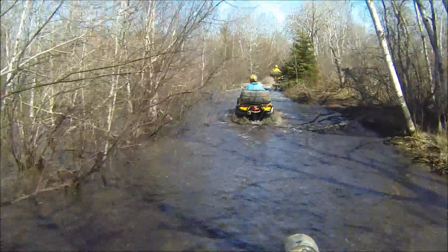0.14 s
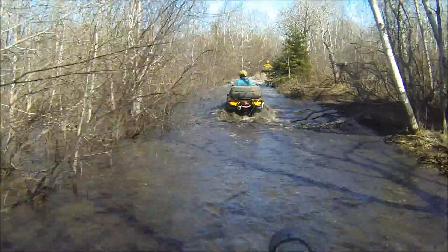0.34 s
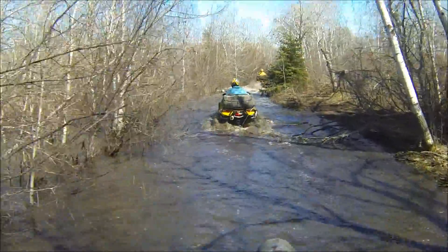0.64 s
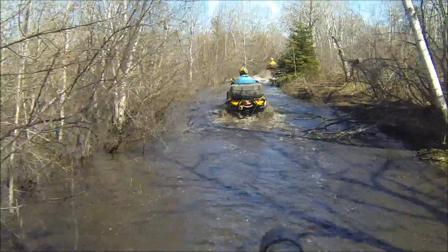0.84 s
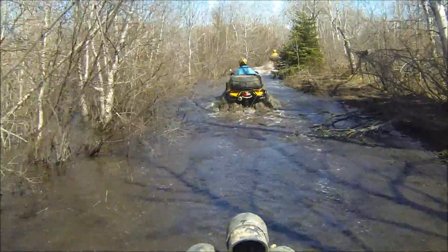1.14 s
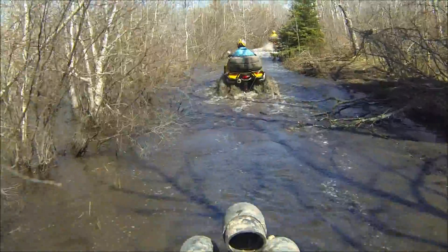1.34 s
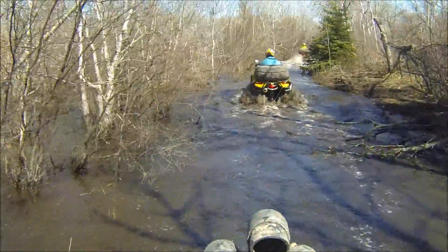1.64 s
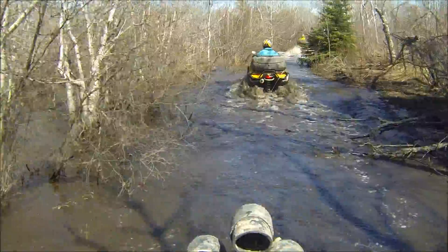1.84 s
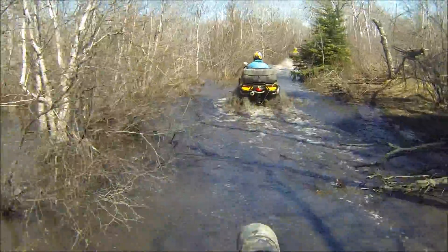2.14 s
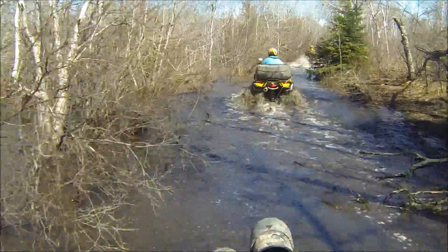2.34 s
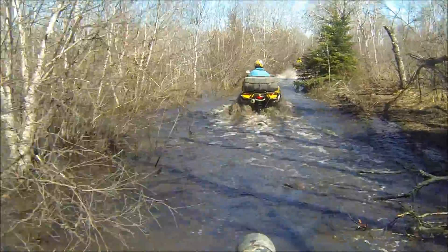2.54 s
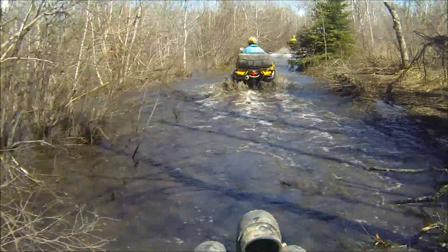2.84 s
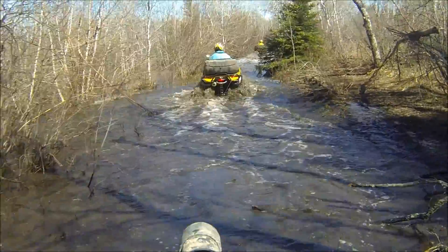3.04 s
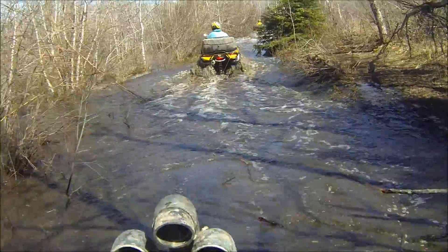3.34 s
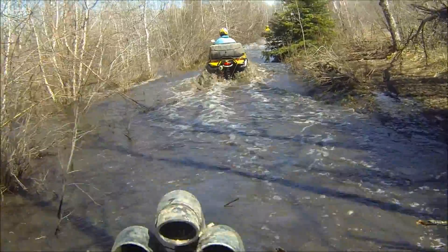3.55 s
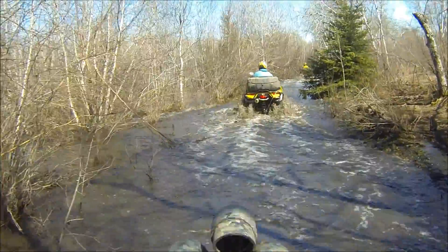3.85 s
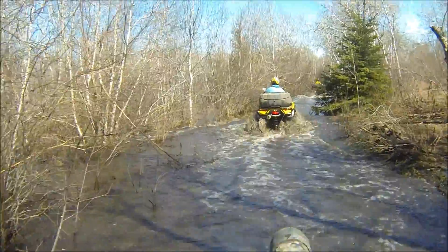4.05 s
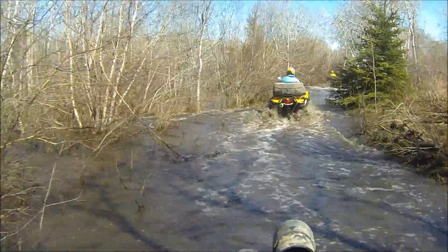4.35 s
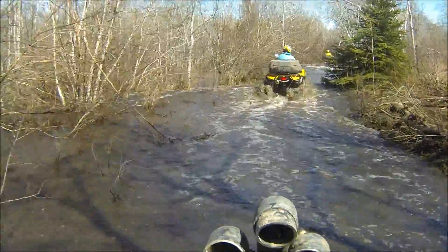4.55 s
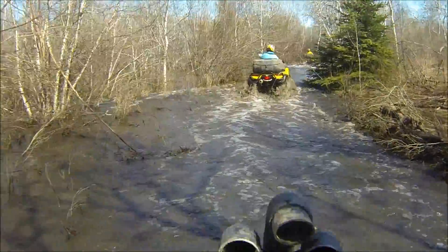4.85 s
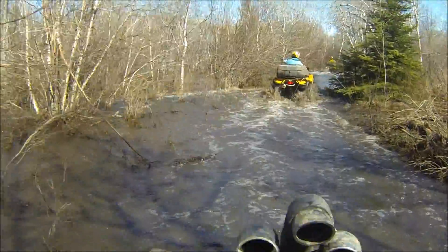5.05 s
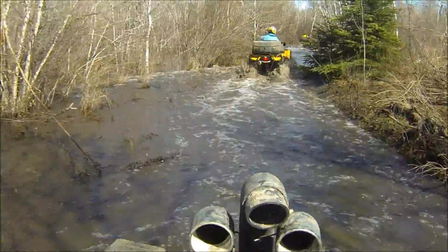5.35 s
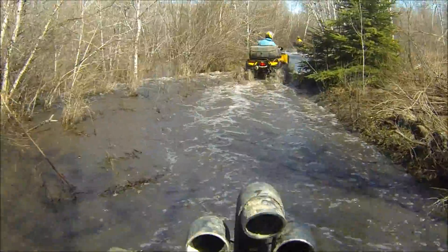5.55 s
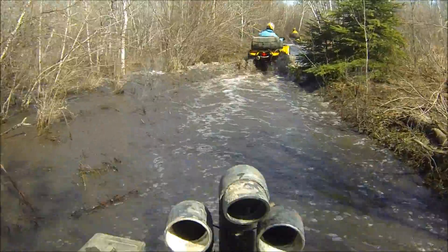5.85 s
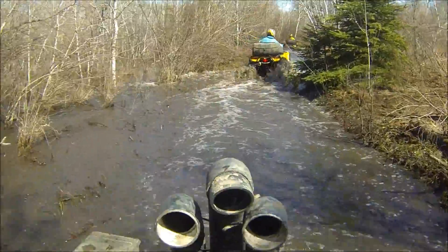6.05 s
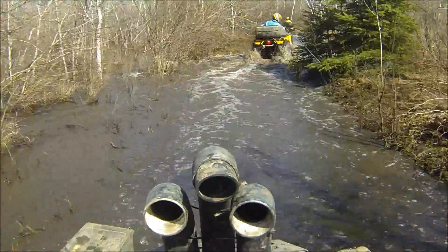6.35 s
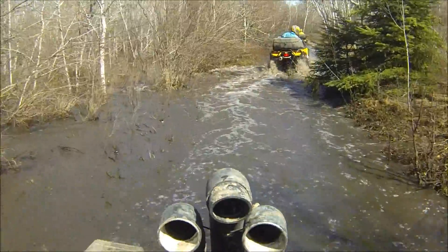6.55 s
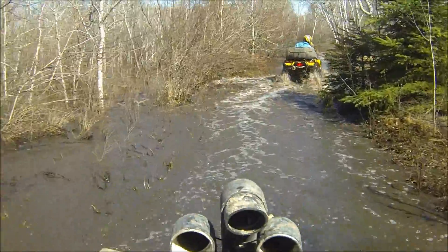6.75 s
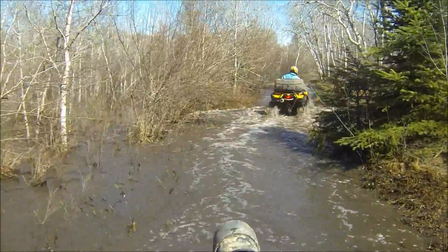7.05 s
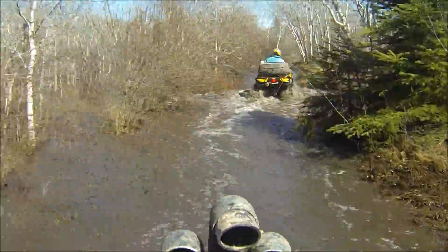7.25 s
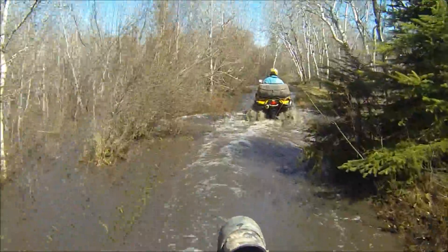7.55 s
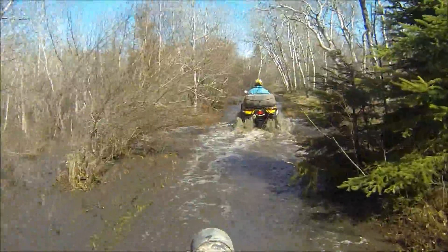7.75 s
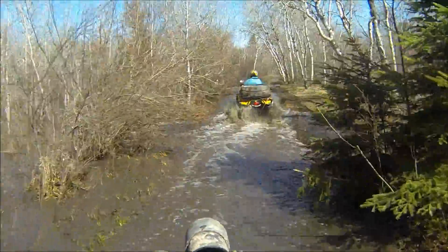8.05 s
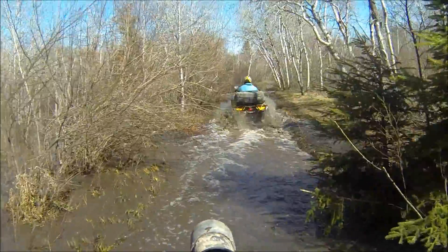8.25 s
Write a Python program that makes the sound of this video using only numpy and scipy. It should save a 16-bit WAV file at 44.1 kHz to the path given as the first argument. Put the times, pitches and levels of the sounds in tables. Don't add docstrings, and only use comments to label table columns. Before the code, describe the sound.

A two-cylinder off-road engine booms and labours unevenly through deep water, revs climbing and dipping, with churning wash and a thin hiss of spray.

```python
import sys
import numpy as np
from scipy import signal
from scipy.io import wavfile
from scipy.ndimage import uniform_filter1d

SR = 44100
rng = np.random.default_rng(int(sys.argv[2]) if len(sys.argv) > 2 else 0)


def int16_out(signal):
    q = np.round(np.clip(np.atleast_2d(signal).T, -1, 1) * 32767)
    wavfile.write(sys.argv[1], SR, q.astype(np.int16))


def invert_db(level):
    return 10 ** (np.asarray(level, dtype=float) / 20)


N = 370881
TIME = np.arange(N) / SR

# (time [s], effort [dB], lean toward the short tube [dB])
EFFORT = [(0, -28, -4.5), (.7, -27.5, -5), (1.2, -24, -4), (1.62, -20.5, -3.5), (1.9, -21.5, -4.5),
          (3.05, -24, -6), (3.2, -27.5, -5.5), (4.2, -26, -5.5), (4.65, -21.5, -3.5), (5.2, -23, -2.5),
          (5.75, -22, -1), (5.95, -17, -4.5), (6.23, -19.5, -7), (6.35, -15.5, -4.5), (6.7, -16, -7),
          (7.1, -24.5, -4), (7.9, -22.5, -6), (8.41, -18.5, -6.5)]
# (time [s], speed [cycles/s])
ENGINE_SPEED = [(0, 34.3), (.2, 31.8), (.61, 30.5), (1.4, 32.9), (2.05, 37.2), (3.3, 39.2), (4.36, 39.3),
                (5.46, 41.7), (5.58, 34.2), (5.72, 33.7), (5.93, 46.7), (6.02, 48.1), (6.55, 49.9),
                (6.77, 49.3), (7.0, 42.3), (7.38, 39), (7.59, 41.3), (8.41, 44.2)]
# (time [s], half length [s], speed change [cycles/s])
SPEED_CHANGES = [(.45, .12, .3), (1.3, .15, -.2), (1.8, .1, .25), (2.55, .1, -.4), (2.9, .3, -.8),
                 (3.35, .08, .3), (4.0, .1, -.35), (4.77, .13, 2.0), (5.03, .1, -.4), (5.7, .06, -.5),
                 (6.2, .1, -.4), (6.85, .07, .5), (7.13, .12, -.3), (7.45, .08, -.3), (7.9, .2, -.3)]
# (time [s], level [dB])
BOW_WAVE = [(0.0, -43.5), (0.02, -60), (3.35, -60), (4.5, -59), (4.82, -56.5), (5.04, -59.5), (5.29, -56),
            (5.46, -57.5), (5.5, -57.5), (5.62, -63), (5.9, -53.5), (5.95, -56.5), (6.02, -53),
            (6.09, -53.5), (6.6, -53), (7.21, -57), (8.39, -56.5), (8.41, -56)]
LAYER_LEVELS = {"long": (-24.5, 1.2, 0.01, -0.0451), "short": (-27, 1.42, 0.01, -0.04),
                "churn": (-29.5, 0.2942, 0.2276, 0.414), "wash": (-29, 0.03, .01, 0.54),
                "casing": (-35, 0.16, -0.07, 0.52), "spray": (-59.5, 0.07, -0.06, 1.25),
                "whistle": (-62.5, -0.5, 0.2, 0.94)}
# (time [s], level [dB])
EXHAUST_BOOM = [(0.0, -36), (0.6, -32.5), (1.4, -31.5), (1.7, -31), (2.2, -32.5), (3.1, -32.5),
                (3.6, -31.5), (4.2, -29.5), (4.8, -31), (5.4, -31.5), (5.62, -36.5), (5.75, -26.5),
                (5.9, -30.5), (6.3, -33.5), (6.7, -32.5), (7.0, -33), (7.5, -30.5), (8.41, -32)]
# (level [dB], change per speed [dB per cycle/s])
EXHAUST_ORDERS = [(-4.5, -0.13), (7.5, 0.08), (-1.2, 0.63), (-0.2, 0.06), (-0.36, -0.5), (-5.5, 0.06),
                  (-13, -0.12), (-7, 0.37), (-9, 0.35), (-6, 0.27), (-8.5, 0), (-15, -0.05), (-12, 0.35),
                  (-12.5, 0.17), (-30.5, -0.6)]
# (frequency [Hz], width [Hz], level [dB])
PIPE_RESONANCES = [(83.9, 7.1, -5.0), (99.8, 12.6, 4.5), (153.8, 34, -7.1), (199, 24.8, 13),
                   (261.6, 31, 7.5), (316, 5.9, -5.5), (338, 27.2, -0.5), (402.4, 20, 4.5), (498, 41, -9),
                   (568, 41, 5.5), (642, 69, -11)]
ORDER_MEETINGS = {"1": [(6.45, 0.72, 12)], "2": [(2.69, 0.32, 3), (5.53, .05, 5), (7.02, 0.28, -2.5)],
                  "3": [(3.4, 0.2, -15), (5.51, .035, 9), (5.58, .09, 15), (5.8, .05, 7.5),
                  (6.1, 0.24, 6.5), (7.03, 0.26, -21)], "4": [(4.57, 1.3, 5.5), (6.54, 0.15, -12.5)],
                  "5": [(.74, 0.78, -24), (5.8, .05, -1.5), (6.63, 0.32, 7)], "6": [(.3, 0.24, -22),
                  (1.62, 0.16, 5.5), (6.86, .09, 9.3), (7.75, 0.14, 6)], "7": [(4.01, .53, -20),
                  (8, .4, 10.5)], "8": [(3.98, 0.26, -8), (5.87, 0.058, 13.5), (8.19, 0.53, 12.4)],
                  "9": [(7.1, 0.2, -14)], "10": [(.63, 0.39, -18)], "11": [(1.08, 0.37, 4.5)]}
# (time [s], half length [s], depth [0-1])
UNEVEN_SPELLS = [
    (.2, .1, 0.2),
    (1.677, 0.055, 0.33),
    (2.507, 0.04, 0.55),
]
# (place in cycle [0-1], level [dB])
CYCLE_BLOWS = [
    (0, 3.5),
    (0.389, -0.5),
    (0.719, -14),
]
KNOCK_ORDERS = [-1.5, 4.5, 1.5, -10, 4, 4, 4.5, 0.5, 1.5, 4.5, -7.5, 5.5, 4, 1.5, 1, 1.5, 7.5, 3.5, -21, 3,
                -2.5, 1, 0.5, -3.5, 5]
# (frequency [Hz], width [Hz], level [dB])
INTAKE_TUBES = [
    [(582, 100, -12.5), (851.6, 65, -4), (1105, 174, -13), (1133.3, 137, 7)],
    [(1223, 47.5, 13), (1272, 140, 10)],
]
# (frequency [Hz], width [Hz], level [dB])
CASING_RESONANCES = [(1529, 540, -10), (1892, 132, 1), (2117, 250, -8.5), (2600, 600, -15),
                     (3200, 380, -19.5)]
# (frequency [Hz], level [dB per Hz])
WASH_COLOUR = [(24, -33), (40, -12), (77, 3), (150, -15.5), (197, -9.5), (283, -12), (389, -13.5),
               (453, -20.5), (560, -9), (671, -17), (937, -9.5), (1120, -2.5), (1500, -14), (1950, -50.5),
               (3300, -120)]
# (frequency [Hz], level [dB per Hz])
CHURN_COLOUR = [(820, -30), (1400, -24.5), (1470, -3.5), (1590, 1), (1770, -1.5), (1920, -2), (2040, -2),
                (2220, -1.5), (2400, -10.5), (2610, -14.5), (2770, -9), (3190, -11), (3500, -15.5),
                (4550, -53), (7700, -120)]
# (frequency [Hz], level [dB per Hz])
SPRAY_COLOUR = [(3300, -21.5), (3700, -2.5), (4000, -9), (5300, -11.5), (5620, -17), (5950, -13),
                (7750, -21), (8150, -15.5), (9200, -20), (10500, -26), (11500, -21), (12500, -25.5),
                (13800, -31.5), (15000, -36.5)]
# (frequency [Hz], width [Hz], level [dB])
HOUSING_RESONANCES = [(1912, 14, 10.5), (2140, 60, 1), (2579, 35, 14.5), (3800, 70, 3.5), (4800, 100, 3)]
# (time [s], half length [s], rise above the steady shaking [dB])
RIDE_BUMPS = [(0.03, 0.044, 8), (1.17, .08, 4), (1.5, .2, 6), (2.9, 0.09, 3), (3.55, .1, 5), (4.1, .15, 4),
              (4.68, .15, 9), (5.25, .08, 2), (5.9, .1, 2), (6.3, .05, 9), (6.62, .06, 5), (7.0, 0.17, 5),
              (7.3, .06, 4), (8.2, .2, 4)]

MEAN_DB, MEAN_SPEED, MEAN_WAVE_DB = -23, 40, -59
SHAKE_DB = -29.5
LIFT_OFF_S, LIFT_ON_S, LIFT_EDGE_S, LIFT_DB = 5.49, 5.675, .012, -9.5


def evened(x):
    return x / np.sqrt(np.mean(x ** 2) + 1e-20)


def curve(table, column):
    rows = np.array(table)
    return np.interp(TIME, rows[:, 0], rows[:, column])


def humps(events, t=TIME):
    coarse_t = t[::50]
    total = 0 * coarse_t
    for middle, half, size in events:
        total = total + size * np.exp(-((coarse_t - middle) / half) ** 2)
    return np.interp(t, coarse_t, total)


def wander(hz):
    steps = rng.standard_normal(N // 100 + 1000)
    lowpass = signal.butter(2, hz, fs=SR / 100, output="sos")
    slow = signal.sosfilt(lowpass, steps)[-(N // 100 + 2):]
    return np.interp(np.arange(N) / 100, np.arange(len(slow)), evened(slow))


def bumps_db(modes, hz):
    return sum(db / (1 + (2 * (hz - f) / width) ** 2) for f, width, db in modes)


def resonate(x, hz, width):
    return signal.lfilter(*signal.iirpeak(hz, hz / width, fs=SR), x)


def ring(x, modes):
    total = 0
    for hz, w, db in modes:
        once = resonate(x, hz, 1.11 * w)
        total = total + invert_db(db) * resonate(once, hz, 1.11 * w)
    return evened(total)


def noise(points, modes, patchy_db=1.0):
    frames, hz = N // 512 + 5, np.fft.rfftfreq(2048, 1 / SR)
    a, b, patches = rng.standard_normal((frames, 1025, 3)).T
    patches = uniform_filter1d(patches, size=16, axis=0)
    patches = evened(uniform_filter1d(patches, size=6, axis=1))
    f, db = np.transpose(points)
    colour = np.interp(np.log(hz + 1), np.log(f + 1), db, left=-120, right=-120)
    colour = colour + bumps_db(modes, hz)
    spectra = (a + 1j * b) * invert_db(colour[:, None] + patchy_db * patches)
    return evened(signal.istft(spectra, nperseg=2048, noverlap=1536)[1][:N])


def speed():
    return uniform_filter1d(curve(ENGINE_SPEED, 1), size=2500) + humps(SPEED_CHANGES)


def effort_db():
    shut = np.tanh((TIME - LIFT_OFF_S) / LIFT_EDGE_S) - np.tanh((TIME - LIFT_ON_S) / LIFT_EDGE_S)
    return curve(EFFORT, 1) - MEAN_DB + LIFT_DB * shut / 2


def level(layer):
    db, per_effort, per_speed, per_wave = LAYER_LEVELS[layer]
    db = db + per_effort * effort_db() + per_speed * (speed() - MEAN_SPEED)
    return db + per_wave * (curve(BOW_WAVE, 1) - MEAN_WAVE_DB)


def firing_phase(order, blows):
    return np.angle(sum(invert_db(db) * np.exp(-2j * np.pi * order * place) for place, db in blows))


def exhaust(turns):
    turns, rate = turns[::10], speed()[::10]
    boom_db = curve(EXHAUST_BOOM, 1)[::10]
    depth = 0.1 + humps(UNEVEN_SPELLS)[::10]
    boom = 0
    for k, (db, per_speed) in enumerate(EXHAUST_ORDERS, 1):
        order_db = boom_db + db + per_speed * (rate - MEAN_SPEED)
        order_db += bumps_db(PIPE_RESONANCES, k * rate)
        order_db += humps(ORDER_MEETINGS.get(str(k), []), TIME[::10])
        order_db = uniform_filter1d(order_db, size=200)
        uneven = 1 + depth * wander(10.7)[::10]
        cycles = k * turns + 0.6 * rng.random() + 0.012 * wander(9)[::10]
        phase = firing_phase(k, CYCLE_BLOWS[:2]) + 2 * np.pi * cycles
        boom += invert_db(order_db) * uneven * np.cos(phase)
    return np.sqrt(2) * signal.resample_poly(boom, 10, 1)[:N]


def firing_knocks(turns):
    k = np.arange(16, 84)
    upper_db = np.full(len(k) - len(KNOCK_ORDERS), -1.5)
    strength = invert_db(np.append(KNOCK_ORDERS, upper_db))
    phase = firing_phase(k, CYCLE_BLOWS)
    phase += .7 * rng.standard_normal(len(k))
    at = (turns + .001 * wander(20)) % 1
    knocks, place = 0, np.linspace(0, 1, 2048)
    for weight in (1, .3 * wander(2), .3 * wander(2), .18 * wander(15)):
        shape = strength @ np.cos(2 * np.pi * k[:, None] * place + phase[:, None])
        knocks += weight * np.interp(at, place, shape)
        phase = phase + 1.1 * rng.standard_normal(len(k))
    return knocks * invert_db(.8 * wander(18.0)), at


def air_puffs(at):
    puffs = 0.19 + sum(invert_db(db) * np.exp(-((at - place) % 1) / .15) for place, db in CYCLE_BLOWS)
    band = signal.butter(2, [500, 3400], "band", fs=SR, output="sos")
    return signal.sosfilt(band, puffs * rng.standard_normal(N))


def intake_and_casing(turns):
    knocks, at = firing_knocks(turns)
    drive = evened(knocks) + .36 * evened(air_puffs(at))
    lean_db = curve(EFFORT, 2) + 5
    long_tube = invert_db(level("long") - 0.44 * lean_db) * ring(drive, INTAKE_TUBES[0])
    short_tube = invert_db(level("short") + 1.4 * lean_db) * ring(drive, INTAKE_TUBES[1])
    casing = invert_db(level("casing")) * ring(drive, CASING_RESONANCES)
    return long_tube + short_tube + casing


def wash_and_churn(turns):
    throb = 1 + 0.024 * np.cos(2 * np.pi * turns) + 0.04 * np.cos(4 * np.pi * turns)
    wash = invert_db(level("wash")) * noise(WASH_COLOUR, [(664, 41, -16), (30, 32, -12.0)])
    churn = invert_db(level("churn") - 1.3) * throb * noise(CHURN_COLOUR, HOUSING_RESONANCES)
    return wash + churn


def water_spray():
    spray = noise(SPRAY_COLOUR, HOUSING_RESONANCES, patchy_db=0.6)
    highpass = signal.firwin(101, 6800, pass_zero=False, fs=SR)
    fine = signal.oaconvolve(spray, highpass, "same")
    spray_db = level("spray")
    coarse = invert_db(0.59 * spray_db - 14.5) * (spray - fine)
    return coarse + invert_db(spray_db + 8.5 + 0.93 * wander(40)) * fine


def housing_whistle():
    whistle_db = level("whistle") + 1.5 * wander(6.5)
    return invert_db(whistle_db) * ring(rng.standard_normal(N), [(4710, 33, 0)])


def shaking():
    band = signal.butter(4, [2.5, 24], "band", fs=SR / 100, output="sos")
    lumps = signal.sosfilt(band, rng.standard_normal(N // 100 + 500))
    movement = evened(signal.resample_poly(lumps, 100, 1)[-N:])
    return invert_db(SHAKE_DB + humps(RIDE_BUMPS)) * movement


def scene():
    turns = np.cumsum(speed()) / SR + .55 + 0.0031 * wander(4.1)
    engine = exhaust(turns) + intake_and_casing(turns)
    water = wash_and_churn(turns) + water_spray() + housing_whistle()
    mix = engine + water + shaking()
    return (mix * np.minimum(TIME / .004, 1))[None]


def roll_off(x):
    return signal.sosfilt(signal.butter(12, 15080, fs=SR, output="sos"), x)


def record(dry):
    mix = 3 * np.tanh(dry / 3)
    return roll_off(mix)


dry = scene()
out = record(dry)
int16_out(out)
```